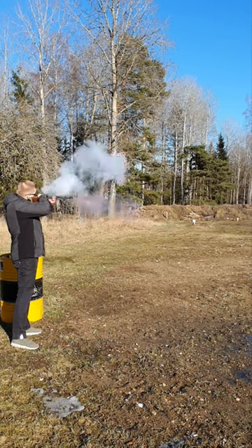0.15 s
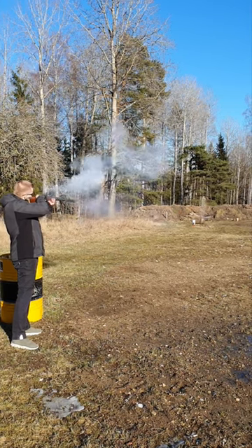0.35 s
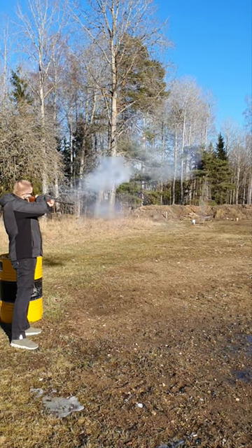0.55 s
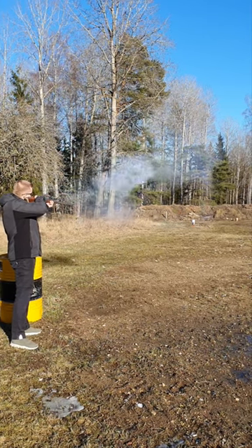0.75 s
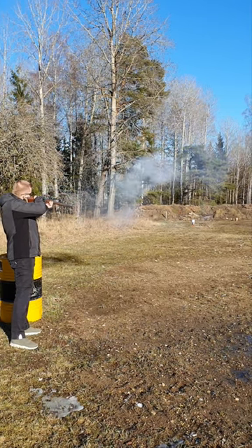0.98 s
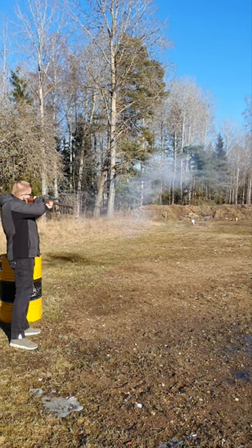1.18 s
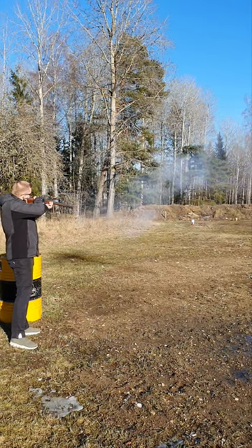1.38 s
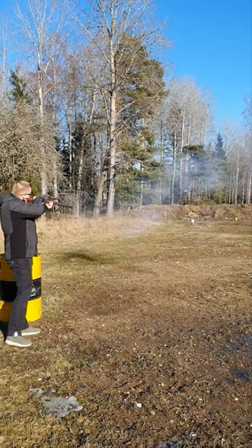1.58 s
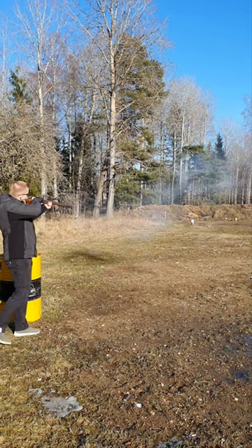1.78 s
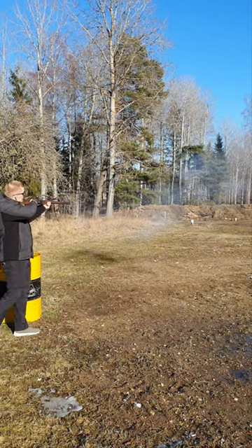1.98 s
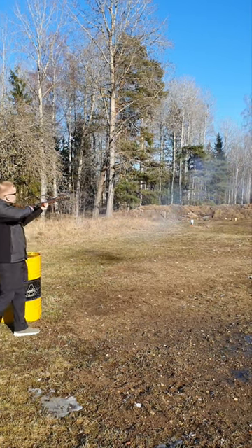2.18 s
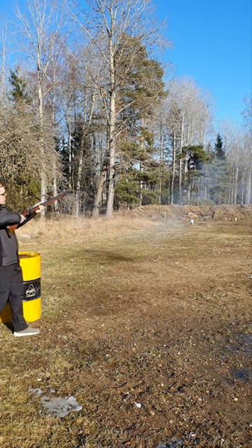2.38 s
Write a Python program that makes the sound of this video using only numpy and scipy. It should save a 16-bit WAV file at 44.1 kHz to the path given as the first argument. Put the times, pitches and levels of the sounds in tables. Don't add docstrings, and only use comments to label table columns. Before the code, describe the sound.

Single black-powder gunshot in an open clearing, heard close on a stereo phone. A short priming crackle precedes the hard blast; slapping echoes scatter into a low tail, then wind puffs, hiss and faint metal ticks.

```python
import sys
import numpy as np
from scipy import signal
from scipy.fft import rfft, irfft, next_fast_len
from scipy.io import wavfile
from scipy.ndimage import uniform_filter1d

SR = 44100
rng = np.random.default_rng(int(sys.argv[2]) if len(sys.argv) > 2 else 0)


def master_out(mix):
    frames = np.transpose(np.atleast_2d(mix))
    ceiling = np.clip(frames, -1, 1)
    pcm = np.round(ceiling * 32767).astype(np.int16)
    wavfile.write(sys.argv[1], SR, pcm)


def boost_factor(decibels):
    exponent = np.asarray(decibels, float) / 20
    return 10 ** exponent


N = 108045
T = np.arange(N) / SR
M = next_fast_len(N + 4096)
F = np.maximum(np.arange(M // 2 + 1) * SR / M, 1)
TREES_PAN_DB = -2.3


def at_hz(table, hz):
    a = np.array(table, float)
    return np.interp(np.log(hz), np.log(a[:, 0]), a[:, 1])


def at_s(table):
    a = np.array(table, float)
    return np.interp(T, a[:, 0], a[:, 1])


def unit(x):
    return x / np.sqrt(np.mean(x ** 2))


def filtered(spectrum):
    return irfft(spectrum, M)[..., :N]


def colour(x, table):
    return unit(filtered(rfft(x, M) * boost_factor(at_hz(table, F))))


def pan(db):
    return boost_factor(np.array([[db / 2], [-db / 2]]))


def walk(rate):
    k = int(SR / rate)
    return unit(uniform_filter1d(uniform_filter1d(rng.standard_normal(N), k), k))


def grains(rate, spread_db, channels):
    hit = rng.random((channels, N)) < rate / SR
    click = hit * rng.standard_normal((channels, N))
    size = np.minimum(rng.exponential(size=(channels, N)), 3)
    return click * boost_factor(spread_db * size)


# [f/Hz, level/dB]
GAS_COLOUR = [(180, -36), (400, -4.5), (1280, -22.5), (2500, -12.5), (4200, -9), (6500, -16.5), (10000, -9),
              (15500, -25.5)]
# [f/Hz, level/dB]
GAS_PAN = [(300, -3.5), (2000, -4.5), (4000, -7.5), (7000, -3), (10000, 2.5)]
# [f/Hz, correlation/1]
GAS_LIKENESS = [(300, .9), (2000, .4), (4000, 0.34), (8000, -0.4)]


def roar():
    rise_s, fall_s, lead_db, level_db = 0.00027, .005, -19, -10
    u = T - .2075
    rise = np.exp(np.minimum(u, 0) / rise_s)
    fall = np.exp(-(np.maximum(u, 0) / fall_s) ** 0.86)
    shape = np.where(u < 0, rise, fall)
    shape = shape + boost_factor(lead_db) * np.exp(-((u + 0.00091) / 0.0042) ** 2)
    mid, side = rfft(rng.standard_normal((2, N)), M)
    skew = .8
    side = skew * 1j * mid + np.sqrt(1 - skew ** 2) * side
    likeness = np.clip(at_hz(GAS_LIKENESS, F), -1, 1)
    mid = mid * np.sqrt(1 + likeness)
    side = side * np.sqrt(1 - likeness)
    lean = boost_factor(at_hz(GAS_PAN, F) / 2)
    ports = irfft(np.array([(mid + side) * lean, (mid - side) / lean]), M)
    return colour(ports, GAS_COLOUR) * shape * boost_factor(level_db)


def thump():
    start_hz, end_hz, glide_s = 380, 75, .0006
    decay_s, punch_s, level_db = .03, .0025, -8.5
    u = np.maximum(T - .2076, 0)
    turns = end_hz * u + (start_hz - end_hz) * glide_s * (1 - np.exp(-u / glide_s))
    fade = np.exp(-u / decay_s) * (0.27 + np.exp(-u / punch_s))
    push = -np.sin(2 * np.pi * turns) * fade * boost_factor(level_db)
    swell = boost_factor(-18) * np.exp(-((T - .2068) / .0012) ** 2)
    return (push + swell) * pan(3)


# [t/s, peak level/dB, pulse length/ms, top f/Hz, left port lag/ms]
ECHO_PULSES = [(.2175, -0.5, 0.22, 8000, 0.069), (.2198, -4, 0.3, 6000, 0.15),
               (.2207, -15, 0.18, 4800, 0.29), (.25753, -5, 0.2, 10000, 0.019),
               (.2605, -15, 0.62, 1500, 0.28), (.286, -18, 0.59, 1980, 0.056),
               (.318, -16, 0.45, 2440, 0.14), (.3215, -21, 0.62, 2500, 0.066),
               (.329, -24, 0.3, 3500, 0.093), (.4015, -22, 0.25, 4500, 0.063),
               (.407, -23, 0.45, 1110, 0.13), (.4495, -24, 0.4, 2500, 0.047),
               (.4523, -27, 0.45, 3000, 0.15), (.467, -23.5, 0.18, 18000, 0.02),
               (.31, -24, 0.3, 4500, 0.05), (.5595, -35, 0.3, 1800, 0.064), (.512, -29, 0.39, 667, 0.085),
               (.528, -23, 1.6, 590, 0.074), (.588, -34, 0.21, 3770, 0), (.5985, -24.5, .8, 2498, 0.15),
               (1.752, -39.5, 0.41, 894, 0.13)]


def echoes():
    size = 2048
    out = np.zeros((2, N + 8192))
    f = np.arange(size // 2 + 1) * SR / size
    lag = np.arange(size) / SR
    for s, db, ms, top_hz, left_ms in ECHO_PULSES:
        w = 2j * np.pi * f * ms / 1000
        shock = w / (1 + w) ** 2 * 2.5 * w / (1 + 4.2 * w)
        pulse = shock / (1 + .9j * f / top_hz - (f / top_hz) ** 2) ** 2
        pulse = pulse / np.max(irfft(pulse))
        noise = rng.standard_normal((3, size))
        trail_s = 0.0034 * (1 + 1789 / top_hz)
        fade = np.exp(-lag / trail_s) * (lag > ms / 1000)
        trail = (noise[0] + 0.22 * noise[1:]) * fade * boost_factor(-10) / np.sqrt(ms * SR / 1000)
        i = int(s * SR) - 64
        late = np.array([[s + left_ms / 1000], [s]]) - i / SR
        delay = np.exp(-2j * np.pi * f * late)
        out[:, i:i + size] += boost_factor(db) * irfft(pulse * (1 + rfft(trail)) * delay)
    return out[:, :N] * pan(TREES_PAN_DB)


# [t/s, peak level/dB, f/Hz, length/cycles]
SHORT_RINGS = [(.2576, -11, 1360, 1.5), (.2579, -17, 3100, 2.5), (.259, -19, 500, 4),
               (.011, -39, 1300, 5.5), (.0165, -38, 1100, 3.5), (.052, -44, 1800, 5.5), (.1, -54, 360, 12),
               (.695, -48, 70, 1.5), (1.425, -47, 48, 1.3), (1.672, -44, 170, 2.5), (.498, -36, 1700, 3.5),
               (.29, -28, 220, 1.1), (.3115, -28, 550, 3.5), (.3292, -21, 910, 1.6), (.35, -36, 70, 1.6),
               (.4069, -31, 143, 1.5), (.4674, -29, 550, 1.5), (.472, -41, 85, 1.6), (.4767, -29, 550, 1.5),
               (.4978, -22, 590, 2.5), (.5154, -30, 300, 2.1), (.52, -31, 610, 1.5), (.531, -36, 93, 2.5),
               (.5468, -33, 550, 2.5), (.5562, -35, 400, 2.5), (.5806, -33, 610, 1.5),
               (.6043, -36, 610, 2.5), (.6078, -37, 143, 1.5), (.6196, -35, 820, 1.5),
               (.6584, -35, 450, 1.5), (.6675, -34, 610, 1.5), (.6778, -39, 670, 2.5),
               (.698, -42, 900, 1.6), (.7456, -38, 550, 1.5), (.752, -41, 820, 2.5), (.7608, -42, 500, 3.5),
               (.7745, -44, 820, 3.5), (.7861, -39, 910, 1.5), (.972, -47, 80, 1.5), (1.469, -52, 520, 2.1),
               (1.495, -52, 480, 2.5)]


def short_rings():
    ring = np.zeros(N)
    for s, db, hz, cycles in SHORT_RINGS:
        u = T - s
        ring += boost_factor(db) * np.cos(2 * np.pi * hz * u) * np.exp(-(2 * hz * u / cycles) ** 2)
    return ring * pan(-1.5)


# [t/s, level/dB]
TREE_TAIL = [(.225, -26.5), (.27, -32.5), (.32, -33), (.37, -37.5), (.405, -38.5), (.435, -41.5),
             (.51, -43), (.565, -43.5), (.61, -39), (.77, -49.5), (.85, -50.5), (.96, -48), (1.12, -53),
             (1.32, -60.5), (1.49, -58), (1.8, -61), (2.02, -67), (2.45, -73.5)]
# [f/Hz, level/dB]
TREE_COLOUR = [(24, -39.5), (40, -3.5), (64, -3), (363, -7), (556, -6), (2210, -17.5), (7540, -31),
               (9940, -27), (16000, -41.5)]
# [f/Hz, loss/dB]
AIR_LOSS = [(50, 24), (150, 25.5), (500, -3.5), (1500, 2), (3000, 18), (6000, 31.5), (10000, 39),
            (16000, 53.5)]
# [f/Hz, correlation/1]
TREE_LIKENESS = [(60, 0.46), (130, .8), (300, 1), (700, .88), (1400, 0.39), (3100, 0.31), (6800, 0.021),
                 (15000, .01)]


def forest():
    trunks_per_s, spread_db, patchy_db, smear_s = 6000, 2.6, 1.3, .003
    mid, side = rfft(unit(grains(trunks_per_s, spread_db, channels=2)), M)
    twig = np.arange(1024) / SR
    smear = rfft(rng.standard_normal(1024) * np.exp(-twig / smear_s), M)
    smear = smear / np.abs(smear)
    mid, side = mid * smear, side * smear
    late = np.maximum(T - .22, 0) ** 1.55
    shared = walk(27)
    out = np.zeros((2, N))
    for hz in 40 * 2 ** np.arange(0, 9, .5):
        band = np.cos(np.pi * np.clip(np.log2(F / hz), -.5, .5)) ** 2
        band = band * boost_factor(at_hz(TREE_COLOUR, F))
        likeness = np.clip(at_hz(TREE_LIKENESS, hz), 0, 1)
        m = np.sqrt(1 + likeness) * filtered(mid * band)
        s = np.sqrt(1 - likeness) * filtered(side * band)
        db = -at_hz(AIR_LOSS, hz) * late + patchy_db * (shared + walk(30))
        out += boost_factor(db) * np.array([m + s, m - s])
    start = np.clip((T - .216) / 0.006, 0, 1)
    return out * boost_factor(at_s(TREE_TAIL) + 17.5) * start * pan(TREES_PAN_DB)


# [t/s, level/dB]
PRIMING = [
    (.003, -51),
    (.014, -40),
    (.023, -51.5),
    (.032, -43.5),
    (.041, -57.5),
    (.055, -47),
    (.066, -62),
    (.075, -55.5),
    (.086, -63),
]
# [f/Hz, level/dB]
PRIMING_COLOUR = [(88, -84), (150, -44.5), (275, -9.5), (821, -2), (1080, -9), (1720, -5), (7320, -19),
                  (8900, -11), (16000, -31.5)]


def flash():
    start_s, tail_db_per_s = 0.0018, 119
    g = grains(6300, 1.5, channels=3)
    fade = np.clip((.2 - T) / .01, 0, 1) * np.clip((T - start_s) / 0.0013, 0, 1)
    fade = fade * boost_factor(-tail_db_per_s * np.maximum(T - PRIMING[-1][0], 0))
    fizz = colour(0.67 * g[0] + 0.72 * g[1:], PRIMING_COLOUR)
    return fizz * boost_factor(at_s(PRIMING) + 2.0) * fade * pan(-3.5)


# [t/s, level/dB, f/Hz, 60 dB decay/s]
LOCK_TICKS = [(2.038, -73, 4140, 0.03), (2.038, -73, 3020, 0.03), (2.038, -76, 5200, 0.015),
              (2.042, -76, 2000, .02), (2.04, -86, 7200, .02), (2.078, -69, 3200, 0.062),
              (2.187, -79.5, 3430, 0.012), (2.187, -82, 4300, .01), (2.187, -77, 2600, .01),
              (2.337, -68, 1700, .012), (2.337, -79, 2724, .01)]


def ticks():
    ring = np.zeros(N)
    for s, db, hz, t60 in LOCK_TICKS:
        u = np.maximum(T - s, 0)
        rough = 0.42 + min(0.014 / t60, 1) * walk(600)
        onset = np.minimum(u / t60 / 0.056, 1)
        ring += boost_factor(db - 60 * u / t60) * np.sin(2 * np.pi * hz * u) * rough * onset
    return ring * pan(-18.0)


# [t/s, length/s, left level/dB, right level/dB]
WIND_PUFFS = [(0.094, 0.12, -58, -79), (0.61, 0.037, -48, -51), (0.813, 0.13, -49.5, -99),
              (0.971, 0.03, -55, -52.5), (1.124, 0.16, -59.5, -87.5), (1.358, 0.036, -61, -77.5),
              (1.431, 0.028, -52, -56), (1.496, 0.02, -41, -46.5), (1.548, 0.016, -39.5, -40.5),
              (1.6, 0.014, -44.5, -58), (1.647, 0.0062, -43.5, -35.5), (1.687, 0.023, -48.5, -38),
              (1.745, 0.015, -36, -37.5), (1.785, 0.023, -41, -77.5), (1.868, 0.033, -42.5, -59),
              (1.939, 0.012, -34, -46), (1.993, 0.017, -45.5, -59), (2.062, 0.036, -38, -86.5),
              (2.144, 0.026, -33, -51), (2.222, 0.036, -37.5, -57), (2.289, 0.01, -39, -44),
              (2.322, 0.011, -35, -42), (2.365, 0.019, -40.5, -49), (2.401, 0.023, -43.5, -75),
              (2.447, 0.009, -37, -52)]
# [f/Hz, level/dB]
LEFT_PORT_WIND = [(20, -16), (50, 0.5), (80, 7.5), (130, -10), (250, -27), (500, -29.5), (1500, -89)]
# [f/Hz, level/dB]
RIGHT_PORT_WIND = [(20, -8), (50, 3.5), (90, 0.5), (150, -4), (300, -16), (500, -26.5), (1500, -78)]


def wind():
    share, leak_db = 0.32, -14
    n = rng.standard_normal((3, N))
    n = np.sqrt(share) * n[0] + np.sqrt(1 - share) * n[1:]
    air = np.array([colour(n[0], LEFT_PORT_WIND), colour(n[1], RIGHT_PORT_WIND)])
    power = uniform_filter1d(uniform_filter1d(air ** 2, 1300, axis=1), 1300, axis=1)
    air = air / np.sqrt(power + 0.2)
    gust = np.zeros((2, N))
    for s, length_s, left_db, right_db in WIND_PUFFS:
        level = boost_factor(np.array([[left_db], [max(right_db, left_db + leak_db)]]))
        gust += level * np.exp(-((T - s) / length_s) ** 2)
    return air * gust


# [t/s, level/dB]
RECORDER_GAIN = [
    (0, -14),
    (.19, -9.5),
    (.2, -17.5),
    (1.25, -21.5),
    (1.6, -13),
    (2.45, -7),
]
# [f/Hz, level/dB]
MURMUR_COLOUR = [(120, -30), (200, -13.5), (340, -7), (380, -10.5), (590, -30.5), (735, -14.5), (1370, -39),
                 (3490, -42), (16000, -54.5)]


def hiss():
    n = rng.standard_normal((3, N))
    murmur = colour(.5 * n[0] + n[1:], MURMUR_COLOUR)
    return murmur * boost_factor(-55 + at_s(RECORDER_GAIN) + walk(11.0))


def scene():
    shot = flash() + roar() + thump()
    returns = echoes() + short_rings() + forest()
    return shot + returns + wind() + ticks() + hiss()


def band_limit(x):
    return signal.sosfilt(signal.butter(12, 16660, fs=SR, output="sos"), x)


# [f/Hz, level/dB]
MIC_PORT = [(4500, -0.5), (7200, -6), (7750, -12.5), (8300, 1), (10500, 1)]


def record(dry):
    ceps = irfft(np.log(boost_factor(at_hz(MIC_PORT, F))), M)
    ceps[1:M // 2] *= 2
    ceps[M // 2 + 1:] = 0
    port = np.exp(rfft(ceps))
    top_cut = 1 / (1 + (F / 16100) ** 90)
    mix = filtered(rfft(dry, M) * port * top_cut)
    return band_limit(mix)


dry = scene()
out = record(dry)
master_out(out)
```